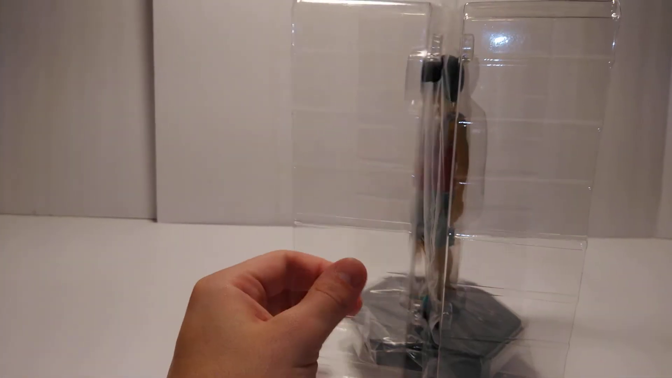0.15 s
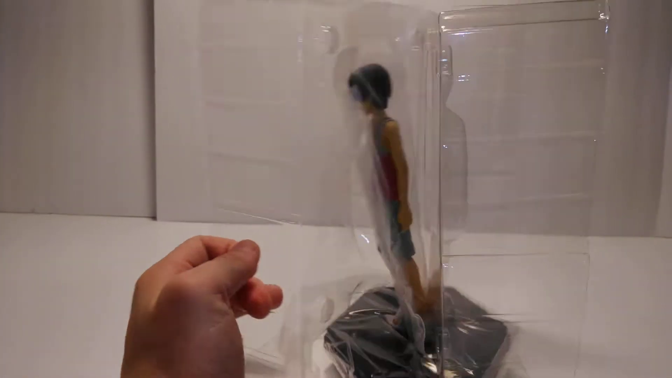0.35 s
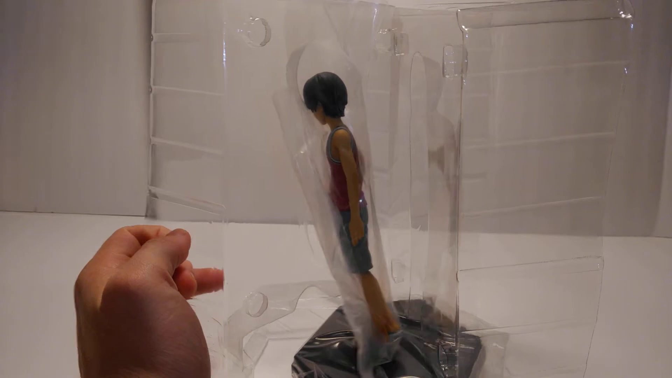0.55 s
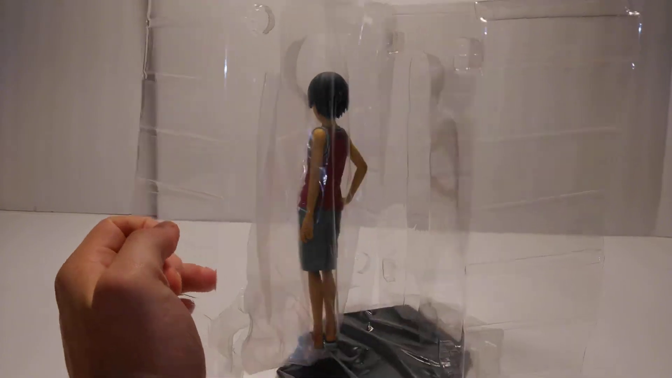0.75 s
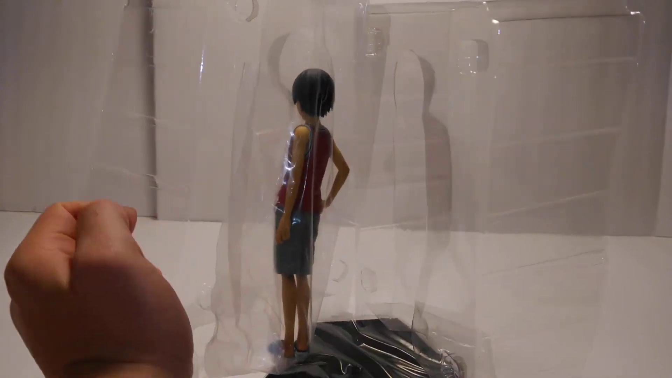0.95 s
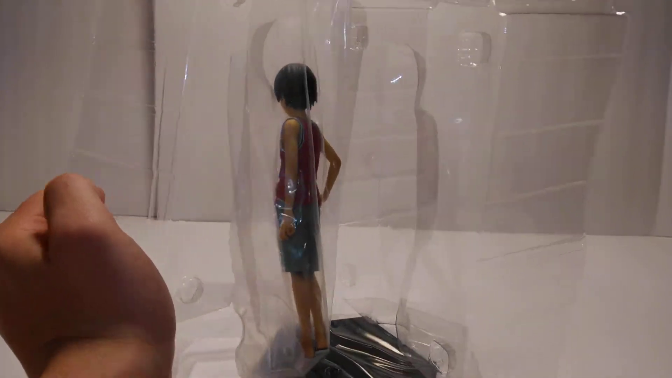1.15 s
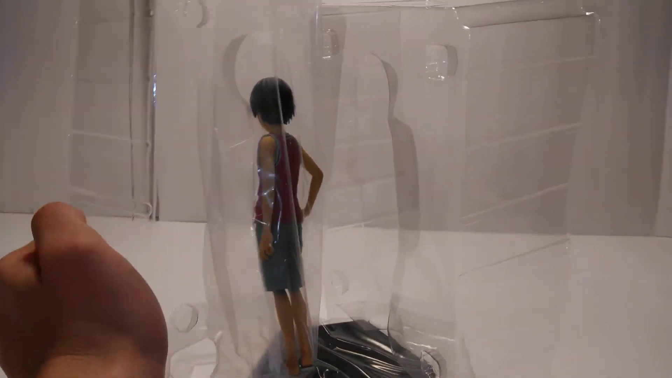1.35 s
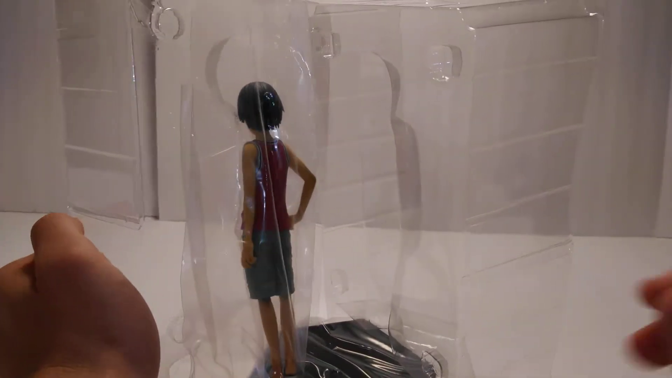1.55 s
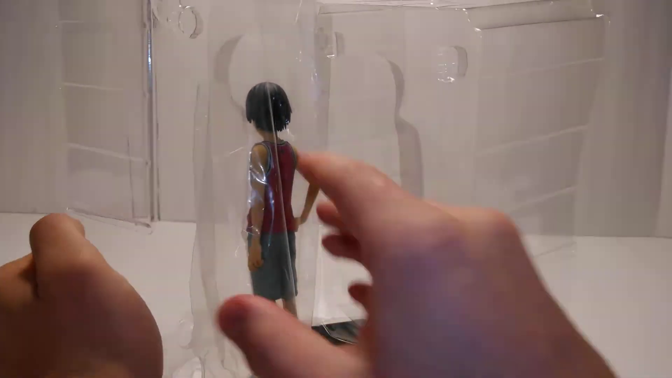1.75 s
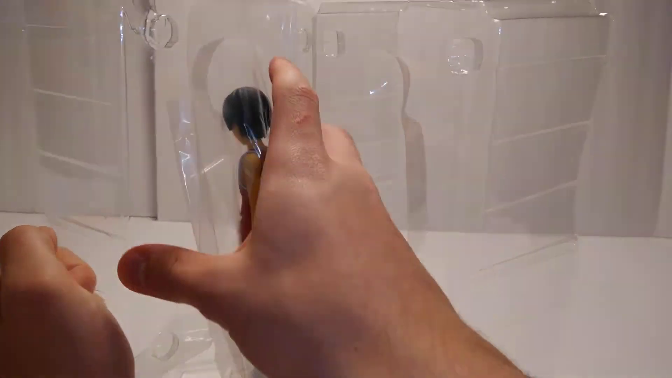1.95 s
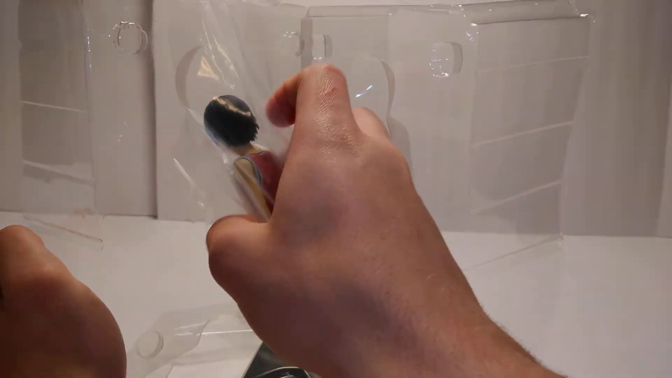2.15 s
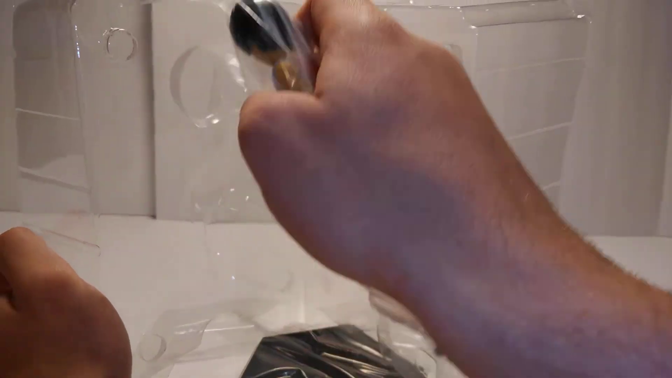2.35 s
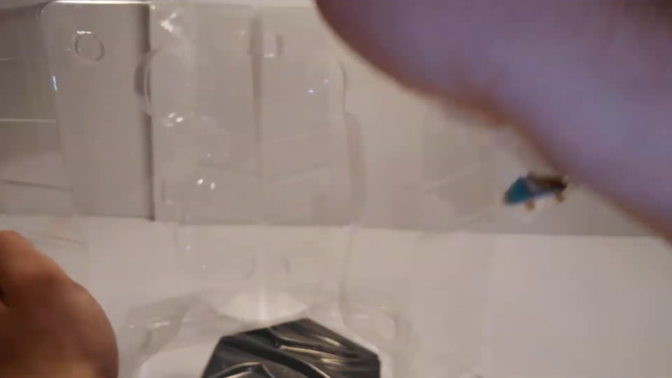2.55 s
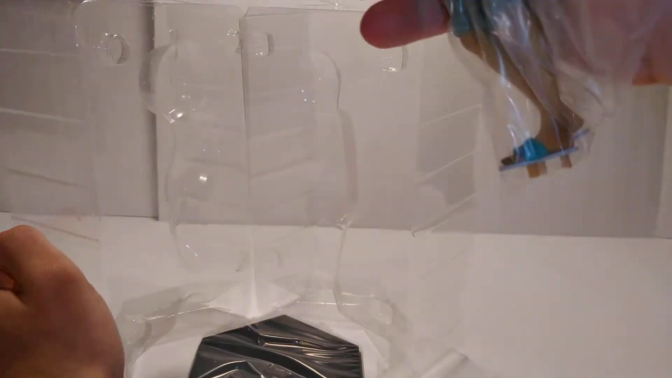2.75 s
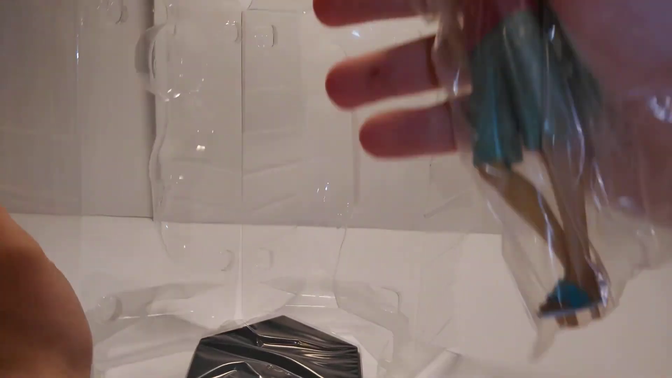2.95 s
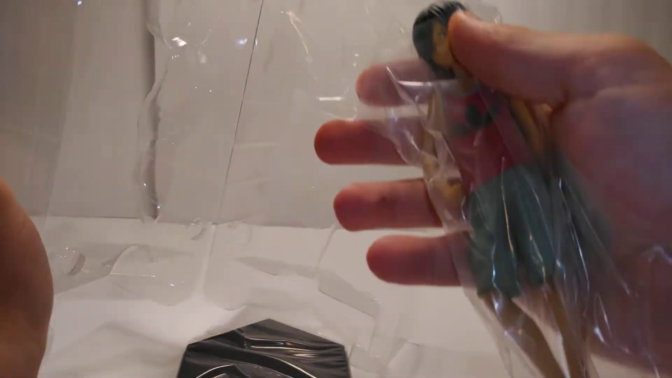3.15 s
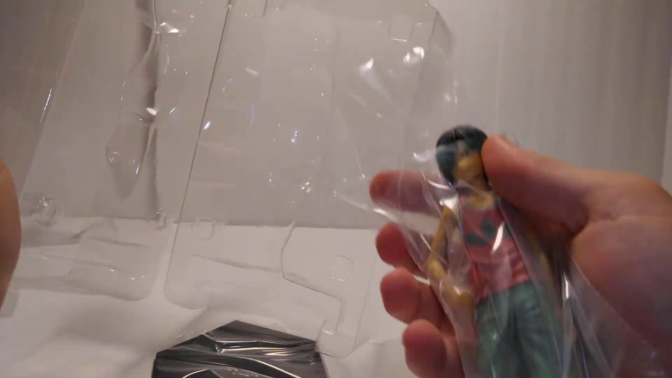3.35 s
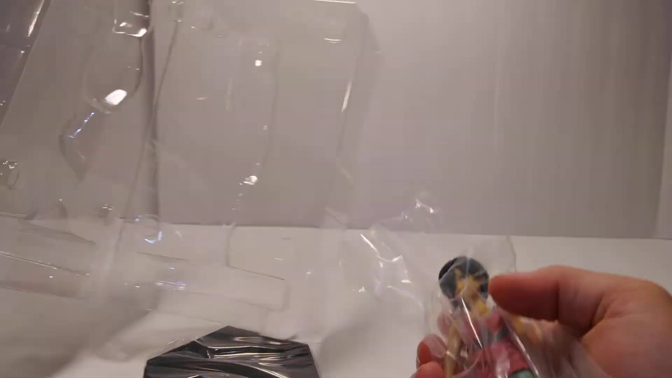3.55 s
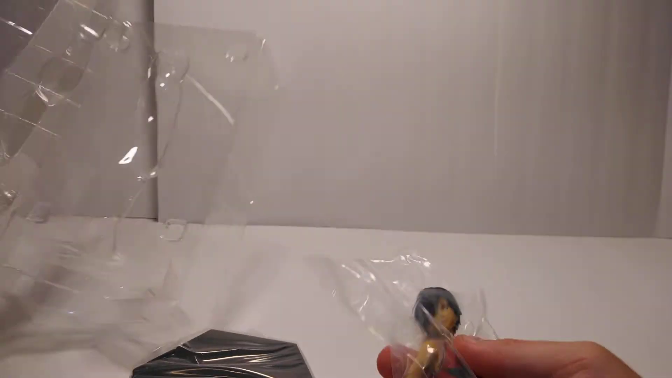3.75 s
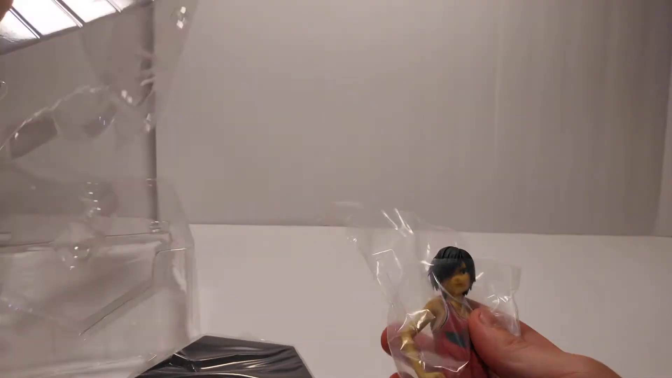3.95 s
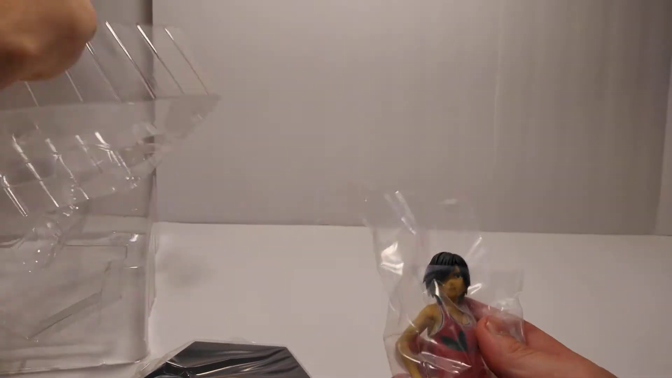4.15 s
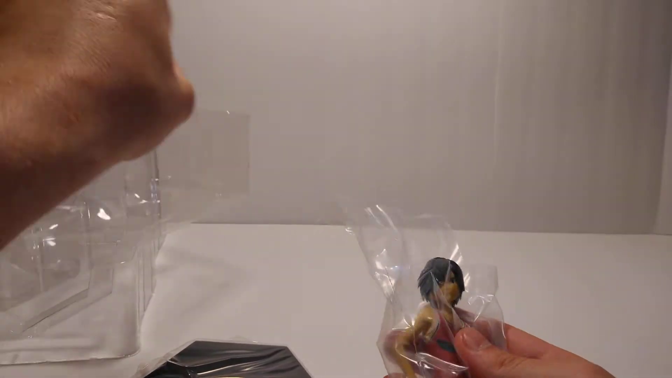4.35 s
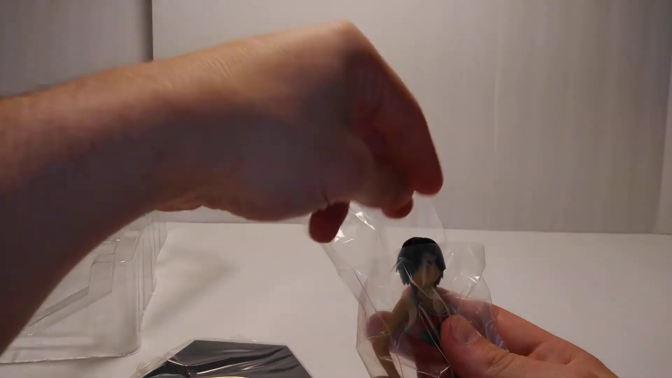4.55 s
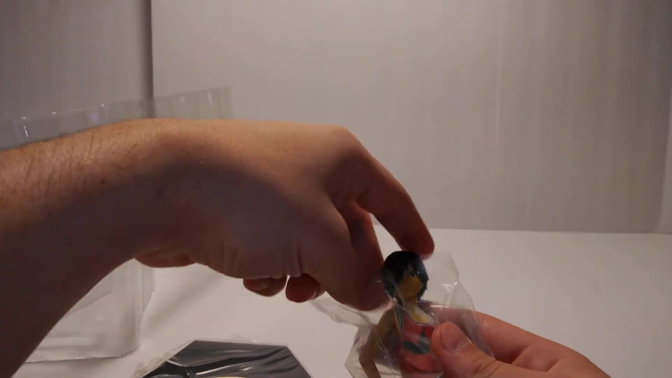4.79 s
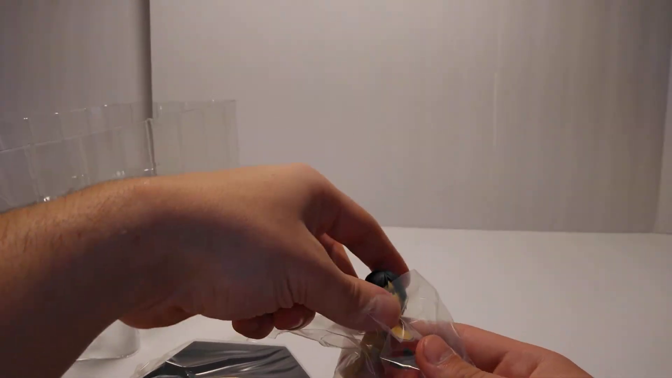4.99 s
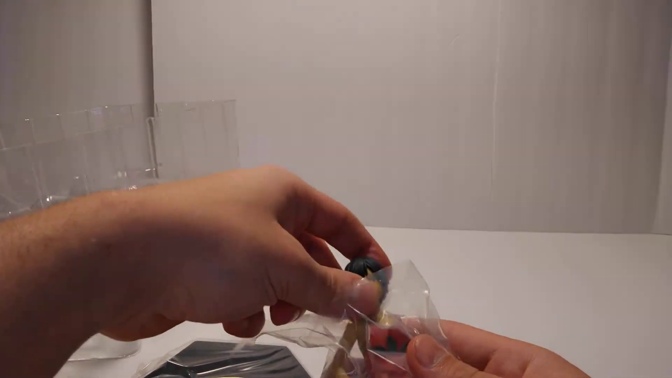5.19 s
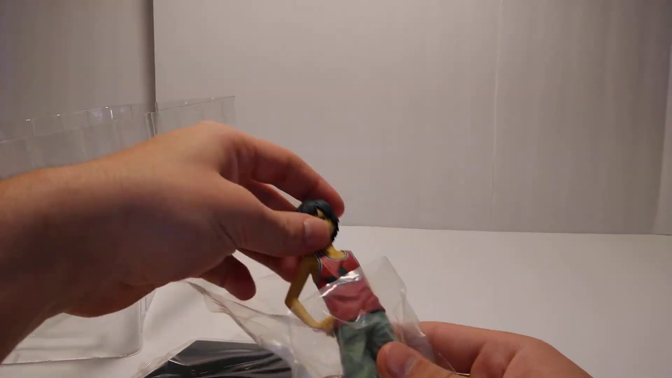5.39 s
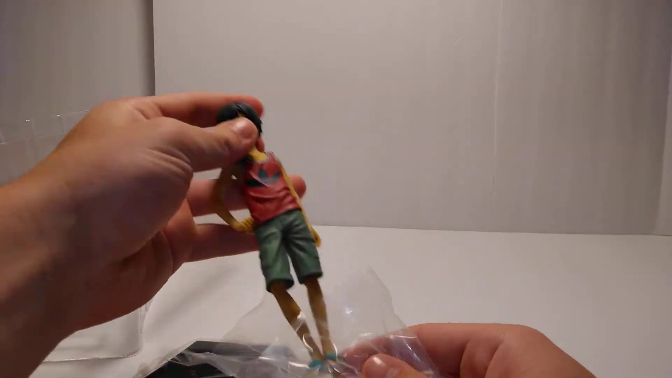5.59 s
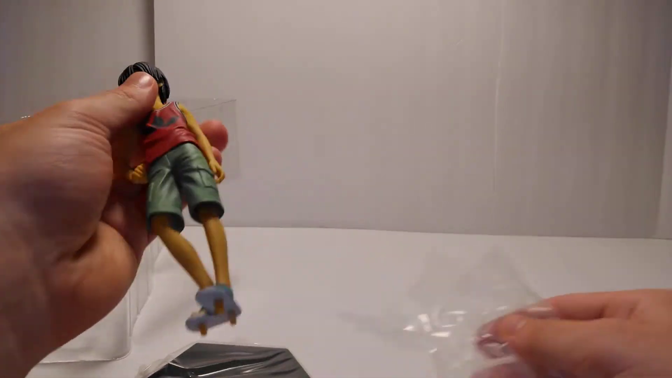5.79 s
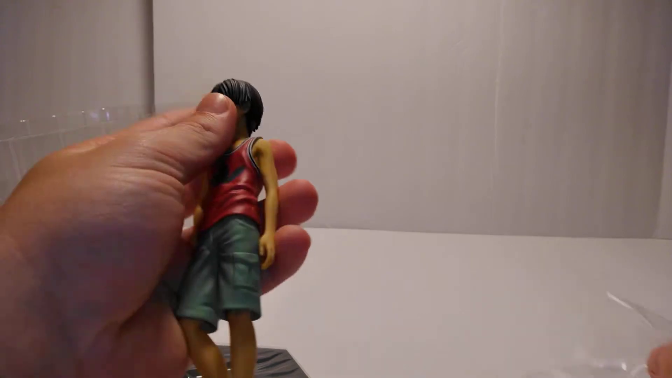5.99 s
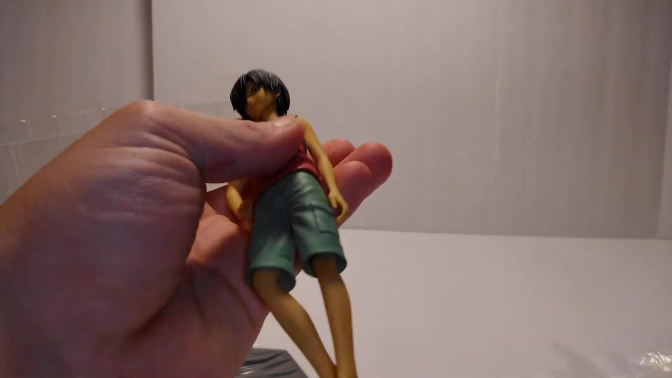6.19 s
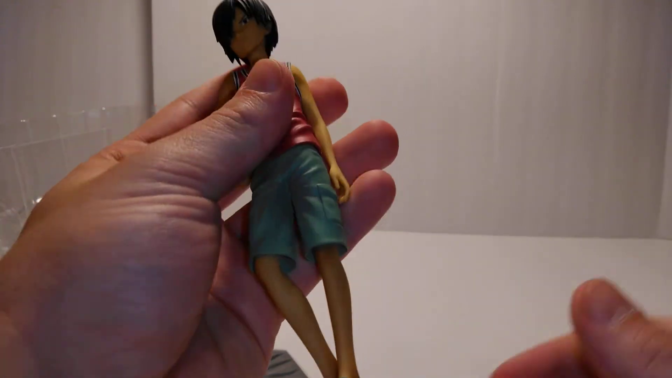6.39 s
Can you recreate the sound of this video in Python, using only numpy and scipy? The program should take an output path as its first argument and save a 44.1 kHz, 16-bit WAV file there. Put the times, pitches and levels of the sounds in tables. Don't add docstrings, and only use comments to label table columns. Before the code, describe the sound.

Close, bright crinkling of packaging: hollow tray knocks, a loud snap as it opens, then fine bag crackle fading to near quiet.

```python
import sys
import numpy as np
from scipy import signal
from scipy.fft import rfft, irfft, next_fast_len
from scipy.io import wavfile
from scipy.ndimage import uniform_filter1d

SR = 44100
rng = np.random.default_rng(int(sys.argv[2]) if len(sys.argv) > 2 else 0)


def master_out(mix):
    frames = np.transpose(np.atleast_2d(mix))
    ceiling = np.clip(frames, -1, 1)
    pcm = np.round(ceiling * 32767).astype(np.int16)
    wavfile.write(sys.argv[1], SR, pcm)


def rack_gain(trim_db):
    fader = np.asarray(trim_db, float)
    return 10 ** (fader / 20)


N = 283563

# pitch_hz, level_db
AIR_SPECTRUM = [(15, -40), (25, 29), (266, 14), (706, 7.5), (1220, -5), (2900, -14), (10700, -40),
                (16500, -46)]
# pitch_hz, t60_s
ROOM_DECAY = [(100, 0.7), (1500, 0.073), (16000, 0.097)]
# start_s, peak_db, pitch_hz
TABLE_BUMPS = [(0.015, -67, 85), (0.33, -49, 62), (0.55, -53, 88.4), (1.441, -60, 127), (1.56, -65, 101),
               (1.995, -51, 55), (2.03, -48, 76.5), (2.09, -57, 65), (2.131, -44, 60), (2.19, -60, 56),
               (2.27, -66, 50), (2.525, -44, 120), (2.557, -62, 136), (2.675, -53, 69), (3.196, -51, 85),
               (3.226, -46.5, 85.7), (3.28, -50.5, 80.5), (3.375, -45, 140), (3.476, -55.5, 81),
               (3.852, -58, 101), (3.991, -47.5, 90), (4.035, -54, 60), (4.12, -57, 75), (4.2, -56, 95),
               (4.26, -63, 70), (5.315, -64, 116), (5.42, -66, 100), (5.775, -64, 80), (6.375, -56, 119)]
# start_s, peak_db, boom_hz, walls_relative_db, t60_s
TRAY_KNOCKS = [(0.183, -52.5, 470, -5, 0.3), (0.304, -29.5, 473, -12, 0.13), (0.435, -35, 221, 3, 0.21),
               (0.789, -32.5, 275, -1.5, 0.18), (0.931, -38, 290, -5.5, 0.071),
               (1.054, -46.5, 190, 0, 0.53), (1.297, -35, 323, -8, 0.064), (1.45, -57, 163, -7, 0.084),
               (1.898, -40.5, 157, -3, 0.11), (2.093, -36, 233, -2, 0.24), (2.19, -40.5, 184, -5, 0.099),
               (2.349, -42.5, 315, -6, 0.18), (2.522, -33.5, 390, 7.5, 0.079), (2.56, -33, 153, -2, .25),
               (2.95, -41, 140, -22, 0.042), (3.193, -38.5, 366, 12.5, 0.21), (3.263, -31, 434, -6, 0.065),
               (3.329, -36, 490, -1.5, 0.043), (3.383, -34.5, 324, -2.5, 0.2),
               (3.994, -31.5, 283, -4.5, 0.32), (4.128, -37.5, 194, -23, 0.14), (5.5, -57, 340, 9, 0.19),
               (6.387, -49.5, 375, -67, 0.087)]
# pitch_hz, width_hz, level_db
HOLLOW_MODES = [(132, 94, -9.5), (212.2, 109, 0.5), (249.7, 77.5, 3), (346, 60, -1), (516, 29, -6)]
# pitch_hz, width_hz, level_db
WALL_MODES = [(607, 190, 3.5), (704, 93, 8.5), (851, 57, 10), (1012, 44, 6.5), (1264, 276, 3.5),
              (1920, 3200, -2.5)]
# start_s, peak_db, pitch_hz
WALL_DENTS = [
    (4.396, -35, 1070),
    (4.51, -51, 930),
    (4.562, -48, 920),
    (4.715, -37.5, 1046),
    (5.581, -46.5, 760),
    (5.853, -55, 940),
]
# peak_s, rise_s, fall_s, level_db, upper_walls_relative_db
TRAY_DRAGS = [(0.17, 0.35, 0.19, -68.5, -7), (0.32, 0.025, 0.17, -41.5, -4.5), (0.81, 0.9, 0.13, -55.5, 2),
              (1.32, 0.23, 0.12, -53, 1), (1.64, 0.57, 0.83, -70.5, 5), (1.95, 0.29, .1, -60, -7),
              (2.12, 0.2, 0.23, -44, 3), (2.55, 0.049, 0.24, -38.5, -2.5), (2.8, 0.19, 0.75, -57.5, 9.5),
              (3.22, 0.04, 0.19, -39.5, 0), (3.7, 0.46, 0.84, -63, 1.5), (4.01, 0.052, 0.15, -43, -2),
              (4.14, 0.072, 0.081, -41, -0.5), (4.3, 0.39, 1, -58, 2.5), (4.95, 1, 0.28, -61.5, 7),
              (5.6, 0.34, 0.8, -63.5, -1), (5.87, 0.075, 0.12, -56, 8), (5.96, 0.019, 0.42, -60, 2),
              (6.25, 0.12, 0.16, -63.5, -15), (6.43, 0.079, .1, -48.5, -42)]
# (pitch_hz, width_hz, level_db)
INNER_SLIDES = [
    (0.225, 1.152, -57.5, [(1370, 62, 0)]),
    (2.773, 2.92, -41, [(880, 70, -13), (1580, 72, -7), (2180, 71, -5)]),
]
# pitch_hz, level_db
FILM_SPECTRUM = [(1760, -26.5), (3000, -15.5), (4780, -11), (6280, -10.5), (8370, -4.5), (9940, -1.5),
                 (14400, -11.5), (15800, -37), (16300, -78)]
# pitch_hz, level_db
CREASE_SPECTRUM = [(110, -25), (250, -4), (900, 0), (1250, -1), (1500, 0), (2100, 4.5), (3000, -6),
                   (4500, -13.5)]
# start_s, peak_db, ring_hz, stiff_low_relative_db, left_right_db
LID_RIP = (2.5257, -8, 8700, -9, 0.5)
# start_s, peak_db, ring_hz
STIFF_CRACKS = [(0.3092, -24.5, 7600), (0.684, -32, 8150), (0.7101, -25.5, 2700), (0.7944, -35, 2920),
                (1.344, -30.5, 11500), (1.6375, -36, 9200), (1.9035, -40, 3180), (1.9404, -35.5, 8200),
                (2.3492, -21.5, 7900), (2.4501, -26, 8900), (3.2181, -26.5, 7100), (3.2657, -25, 7400),
                (3.384, -24.5, 11000), (3.5386, -24.5, 8400), (3.975, -37, 9500), (3.9973, -26, 9300),
                (4.1277, -19.5, 8060), (4.383, -25.5, 7700), (4.491, -36.5, 11200), (4.5585, -31.5, 6230),
                (4.8397, -26.5, 7400), (5.0363, -37, 5140), (5.0861, -38, 7800), (5.1474, -42, 11100),
                (5.9784, -38, 6250), (6.0535, -35, 4330), (6.218, -33.5, 4100), (6.2515, -42, 9400)]
# start_s, peak_db, ring_hz, left_right_db
LID_TICKS = [(0.5906, -22, 11500, 13.5), (0.6756, -29, 8200, -10), (0.734, -30, 7500, -9),
             (0.7405, -34, 7800, 0), (0.8332, -33, 12100, -12), (1.0721, -33.5, 12000, 26),
             (1.277, -33, 9000, -9), (1.6043, -44.5, 8900, -24), (1.7184, -56, 9140, -25),
             (2.0658, -21.5, 9600, -3), (2.078, -26.5, 8000, 13.5), (2.1015, -20, 8200, -4.5),
             (2.166, -25.5, 4200, -9.5), (2.1776, -29.5, 4530, 14.5), (2.195, -25.5, 11100, -5),
             (2.2148, -24.5, 7300, -11.5), (2.3103, -16, 8600, -1), (2.5084, -24.5, 10600, -5),
             (2.722, -24.5, 7200, -1), (2.934, -35, 7550, -8), (2.981, -24.5, 9100, 2),
             (3.1157, -25, 7700, -13), (3.1475, -32, 10400, 6), (3.24, -25, 7100, 0)]
# start_s, peak_db, ring_hz
THIN_BAG_TICKS = [(3.3561, -22.5, 10500), (3.438, -28, 7660), (3.6552, -23, 11700), (3.689, -22.5, 8240),
                  (3.7741, -23, 7840), (4.0707, -30, 4730), (4.4176, -29.5, 7500), (4.5204, -23, 12300),
                  (4.6885, -33.5, 11100), (4.805, -33, 7500), (4.9115, -28, 7050), (4.974, -24, 7850),
                  (5.1816, -22.5, 8700), (5.235, -32, 8000), (5.2513, -25.5, 9260), (5.3203, -24, 7900),
                  (5.4348, -25, 9900), (5.462, -24.5, 4500), (5.6038, -18, 7840), (5.6982, -21, 10200),
                  (5.8005, -28, 9600)]
# start_s, peak_db, ring_hz
LID_FLICKS = [(0.2951, -26, 6800), (0.3387, -26, 7900), (0.3836, -29, 10700), (0.443, -24, 3720),
              (0.5941, -30, 10200), (0.7797, -31, 8100), (0.8623, -33, 11300), (0.9219, -45, 6550),
              (1.1706, -35.5, 7260), (1.2369, -38, 9900), (1.2522, -37, 8300), (1.6325, -38, 8260),
              (1.9593, -45, 6700), (1.963, -30, 8200), (1.9668, -36, 8450), (1.9703, -33.5, 8070),
              (2.1224, -25, 6700), (2.1506, -20.5, 8400), (2.2264, -26, 6530), (2.2319, -24.5, 8700),
              (2.2549, -24.5, 8900), (2.2688, -18, 8350), (2.2823, -13.5, 10600), (2.2923, -17, 8800),
              (2.3165, -35.5, 8700), (2.321, -16, 8740), (2.329, -30, 12100), (2.3709, -28, 8300),
              (2.3783, -14, 7100), (2.3881, -25, 8320), (2.3998, -23, 8500), (2.4749, -39, 5400),
              (2.4831, -35, 8660), (2.4866, -35, 7800), (2.5026, -20, 7700), (2.5659, -21, 9300),
              (2.762, -43.5, 4700), (2.7667, -24, 6600), (2.7747, -27, 12900), (2.7812, -24, 13200),
              (2.7852, -18, 8200), (2.7927, -20.5, 13100), (2.838, -26, 11900), (2.87, -22.5, 11800),
              (2.9525, -28, 5900), (2.989, -26, 9050), (2.9977, -50, 2600), (3.1222, -30, 7100),
              (3.1281, -31, 8300), (3.1957, -32, 2580)]
# start_s, peak_db, ring_hz
THIN_BAG_FLICKS = [(3.5322, -22.5, 9700), (3.5492, -30, 9500), (3.6674, -25, 9600), (3.7096, -30, 6900),
                   (3.7278, -25, 8700), (3.7348, -26, 11000), (3.7425, -28.5, 7600), (3.746, -22, 9300),
                   (3.7797, -23, 9300), (3.846, -24.5, 8300), (3.9934, -25.5, 11000), (4.0191, -37, 7100),
                   (4.0288, -29, 11700), (4.0835, -33, 7100), (4.09, -24.5, 7040), (4.1336, -27, 3430),
                   (4.169, -30.5, 6500), (4.2321, -32, 3800), (4.2521, -34, 3800), (4.2718, -37, 8100),
                   (4.3489, -29, 8000), (4.3943, -32, 8600), (4.7018, -43, 10100), (4.7078, -41, 5300),
                   (4.7208, -22, 10700), (4.7325, -33, 8800), (4.7362, -32, 10000), (4.7674, -31, 8100),
                   (4.823, -29, 7750), (4.8522, -32, 7800), (5.1336, -39, 8000), (5.1915, -41, 10900),
                   (5.2561, -30, 9700), (5.2992, -44, 12300), (5.3366, -24, 7150), (5.3444, -27, 9000),
                   (5.3581, -24, 8400), (5.3758, -26, 7900), (5.3833, -29, 9900), (5.3878, -24.5, 7700),
                   (5.4282, -25.5, 6700), (5.4489, -43, 10100), (5.4776, -31, 6900), (5.4918, -28, 11400),
                   (5.5279, -27, 9100), (5.5314, -23, 7700), (5.5424, -29, 9400), (5.5496, -23, 8150),
                   (5.5561, -20, 7400), (5.5818, -24, 8300), (5.5856, -27, 10300), (5.6145, -34, 7200),
                   (5.6277, -19, 4050), (5.6477, -21, 8500), (5.6796, -28, 5140), (5.6878, -28, 7300),
                   (5.7163, -35, 4580), (5.7868, -26, 8000), (5.7946, -32, 6500), (5.8445, -32, 7400)]
# start_s, contact_db, creases_relative_db, crackle_relative_to_slide_db, thinness_db
HAND_CONTACT = [(0.0, -71, -25, -1, 0), (0.2, -82, -43, -15, -1), (0.3, -60.5, 17, -17.5, -23),
                (0.64, -61, 0, -17, 4), (0.85, -63, 6, -6, -18), (1.25, -68.5, 6, -9, -0.5),
                (1.46, -81, -15, -25, 4), (1.76, -90, 10, -10, -23), (2.1, -48, -6.5, -8.5, -10),
                (2.5, -48.5, -13.5, -18, -10), (2.9, -73.5, 5, -11.5, -12), (3.5, -57.5, -0.5, 3, -12),
                (3.94, -48, -9.5, -25.5, -12), (4.4, -62.5, 0.5, 7.5, -23), (4.67, -91.5, 17.5, 2, -21),
                (4.9, -51.5, -7.5, -3, -20), (5.17, -67, -5, 2, -5), (6.43, -70.5, -35, -7.5, -32)]
# peak_s, rise_s, fall_s, effort_db, creases_relative_db
OPENING_GRIPS = [(0.0, .05, 0.54, -52.5, -32), (0.228, .012, 0.088, -39.5, -4.5),
                 (0.415, 0.22, 0.14, -37, -5.5), (0.594, 0.013, 0.037, -51, -17),
                 (0.68, 0.021, 0.13, -71, 0), (1.066, 0.43, 0.2, -49, -15), (1.346, 0.15, 0.12, -59, -4),
                 (1.607, 0.4, 0.11, -62, -12), (1.965, 0.0078, 0.014, -43, -18),
                 (1.94, 0.066, 0.038, -61, 0), (2.108, 0.023, 0.071, -39.5, 1.5),
                 (2.254, 0.012, 0.036, -25.5, -34), (2.28, 0.04, 0.034, -35.5, -51),
                 (2.315, 0.017, 0.017, -35.5, -32), (2.383, 0.035, 0.021, -37, -11.5),
                 (2.531, 0.019, .26, -30, -9.5), (2.775, 0.041, 0.21, -36.5, -15.5),
                 (2.83, 0.041, 0.075, -37.5, -15), (2.868, 0.11, .025, -35.5, -16.5),
                 (2.953, 0.015, 0.036, -42, -6), (2.997, 0.0096, 0.0067, -34, 0),
                 (3.055, 0.25, 0.077, -40.5, -9.5), (3.122, 0.013, 0.13, -48.5, -7),
                 (3.232, 0.1, 0.17, -45, -32)]
# peak_s, rise_s, fall_s, effort_db, creases_relative_db
THIN_BAG_PULLS = [(3.545, 0.04, 0.064, -42, -8.5), (3.749, 0.14, 0.11, -42.5, -4),
                  (3.86, 0.19, 0.11, -29.5, -47.5), (3.9, 0.072, 0.06, -36.5, -37),
                  (3.998, 0.0058, 0.072, -37.5, -8), (4.09, 0.012, 0.21, -38.5, -17),
                  (4.273, 0.079, 0.073, -43, -14), (4.352, 0.0089, 0.033, -53, 3.5),
                  (4.564, 0.016, 0.099, -53, -2), (4.716, 0.041, 0.13, -48.5, -1),
                  (4.847, 0.03, 0.1, -45.5, -7), (5.188, 0.011, 0.075, -55.5, -8.5),
                  (5.346, 0.14, 0.17, -40.5, -13), (5.477, 0.091, 0.088, -63, -31),
                  (5.635, 0.34, 0.17, -38.5, -13), (5.794, 0.052, 0.24, -46.5, -7),
                  (6.112, 0.28, 0.14, -56.5, -9.5), (6.25, 0.17, 0.2, -60, -13)]


def evened(x):
    return x / np.sqrt(np.mean(x ** 2) + 1e-20)


def read(points, hz):
    f, value = np.transpose(points)
    return np.interp(np.log(hz + 1), np.log(f + 1), value)


def curves(rows):
    s, *columns = np.transpose(rows)
    return [np.interp(np.arange(N) / SR, s, column) for column in columns]


def colour(x, points):
    length = x.shape[-1]
    size = next_fast_len(length, True)
    gain = rack_gain(read(points, np.fft.rfftfreq(size, 1 / SR)))
    return irfft(rfft(x, size) * gain, size)[..., :length]


def ring(x, modes):
    out = 0
    for k, (hz, width_hz, db) in enumerate(modes):
        pole = np.exp((-np.pi * width_hz + 2j * np.pi * hz) / SR)
        mode = signal.lfilter([1 - abs(pole)], [1, -pole], x).imag * 2
        out = out + (-1) ** k * rack_gain(db) * mode
    return out


def add(mix, s, sound):
    part = mix[:, round(s * SR):][:, :sound.shape[1]]
    part += sound[:, :part.shape[1]]


def pair(shared, own, lag, same):
    same = np.clip(same, 0, 1)
    direct = np.array([np.roll(shared, int(lag)), shared])
    return same * direct + np.sqrt(1 - same ** 2) * own


def strokes(rows, rest_db, rest_part_db):
    t = np.arange(N) / SR
    main = rack_gain(2 * rest_db) + 0 * t
    part = rack_gain(2 * (rest_db + rest_part_db)) + 0 * t
    swell_power = 1.623
    for s, rise, fall, db, part_db in rows:
        start, end = s - abs(rise), s + abs(fall)
        span = slice(max(round(start * SR), 0), round(end * SR))
        swell = np.interp(t[span], [start, s, end], [0, 1, 0]) ** (2 * swell_power)
        main[span] += rack_gain(2 * db) * swell
        part[span] += rack_gain(2 * (db + part_db)) * swell
    return np.sqrt(main), np.sqrt(part)


def swarm(per_s, spread_db, clump_db, tail_ms, same, facet_db, count=10):
    strength = rack_gain(spread_db * np.minimum(rng.exponential(1, N), 3.5))
    strength = strength * (rng.random(N) < per_s / SR)
    place = rng.integers(0, count, N)
    t = np.arange(600) / SR
    shape = np.exp(-t * 1000 / tail_ms) * (1 - np.exp(-t / 0.0004))
    out = np.zeros((2, N))
    for k, hz in enumerate(np.geomspace(1500, 13000, count)):
        busy = evened(uniform_filter1d(rng.standard_normal(N // 128 + 1), size=8))
        busy = np.repeat(busy, 128)[:N]
        shared, *own = rng.standard_normal((3, len(t))) * shape
        flutter = pair(np.roll(shared, 8), np.array(own), rng.integers(-4, 14), same)
        flutter = colour(flutter, [(hz / 1.71, -facet_db), (hz, 0), (hz * 2.8, -facet_db)])
        strikes = strength * (place == k) * rack_gain(clump_db * busy)
        out += signal.oaconvolve(strikes[None], evened(flutter), axes=1)[:, :N]
    return evened(out)


def air():
    shared, *own = rng.standard_normal((3, N))
    own = colour(np.array(own), [(200, 1.0), (900, 14.5)])
    return rack_gain(-84) * evened(colour(pair(shared, own, 0, same=0.7), AIR_SPECTRUM))


def room(x):
    taps = np.zeros((2, SR // 2))
    at = np.arange(300, SR // 2 - 20, 20)
    at = at + rng.integers(0, 20, (2, len(at)))
    np.put_along_axis(taps, at, rng.choice([-1., 1.], at.shape), 1)
    taps[1] = taps[1] + colour(taps[0] - taps[1], [(250, 2.5), (900, -26)])
    hz, t, z = signal.stft(taps, SR, nperseg=256)
    decay = rack_gain(-60 * t / read(ROOM_DECAY, hz)[:, None])
    tail = signal.istft(z * decay, SR, nperseg=256)[1]
    return signal.fftconvolve(x, tail / np.linalg.norm(tail[0]), axes=1)[:, :N]


def bumps():
    out, t = np.zeros((2, N)), np.arange(12000) / SR
    rise_s, t60_s = 0.006, 0.1
    shape = (1 - np.exp(-t / rise_s)) * rack_gain(-60 * t / t60_s)
    for s, peak_db, hz in TABLE_BUMPS:
        push = np.sin(2 * np.pi * hz * t) * shape
        add(out, s, rack_gain(peak_db + 5.0) * pair(push, 0, 6.6, same=1))
    return out


def scrape():
    level, walls = strokes(TRAY_DRAGS, -101.5, 4.0)
    taps = swarm(per_s=500, spread_db=0.5, clump_db=3.0, tail_ms=0.18, same=0.91, facet_db=-8.0, count=4)
    blended = taps + 0.33 * taps[::-1]
    boom = evened(ring(colour(blended, [(60, -16.5), (140, -1)]), HOLLOW_MODES))
    out = rack_gain(0.5) * (level * boom + walls * evened(ring(taps, WALL_MODES)))
    for start, end, slide_db, hollow in INNER_SLIDES:
        stroke = np.interp(np.arange(N) / SR, [start - 0.02, start, end - 0.03, end], [0, 1, 1, 0])
        out = out + rack_gain(slide_db) * stroke * evened(ring(taps, hollow))
    return out


def dents():
    out, t = np.zeros((2, N)), np.arange(1500) / SR
    shape = (1 - np.exp(-t / 0.00035)) * rack_gain(-60 * t / 0.031)
    for s, peak_db, hz in WALL_DENTS:
        pip = np.sin(2 * np.pi * hz * t) * shape
        add(out, s, rack_gain(peak_db + 12.0) * pair(pip, 0, 15.2, same=0.77))
    return out


def knocks():
    out, t = np.zeros((2, N)), np.arange(8000) / SR
    blow = 30 * np.exp(-t / 0.0003)
    draws = rng.standard_normal((len(TRAY_KNOCKS), 3, len(t)))
    for (s, peak_db, hz, walls_db, t60), (shared, *own) in zip(TRAY_KNOCKS, draws):
        shape = rack_gain(-60 * t / max(t60, 0.01)) * (1 + 1.5 * np.exp(-t / 0.00033))
        drive = pair(shared * shape + blow, own * shape, 6.3, same=0.75)
        drive = colour(drive, [(50, -13), (130, -3)])
        boom = ring(drive, HOLLOW_MODES + [(hz, 45, 3.0)])
        walls = ring(drive, WALL_MODES)
        knock = boom / abs(boom).max() + rack_gain(walls_db) * walls / abs(walls).max()
        add(out, s + 0.003114, rack_gain(peak_db + 2.0) * knock)
    return out


def snap(row, draw, hold_ms):
    s, peak_db, hz, low_db, pan_db = row
    shared, *own, jag = draw
    lead_s = 0.003
    t = np.arange(len(jag)) / SR - lead_s
    after_ms = np.maximum(t * 1000 - hold_ms, 0)
    onset = np.exp(np.minimum(t, 0) / 0.00015)
    flutter = np.exp(-after_ms / 0.8) + 0.3 * np.exp(-after_ms / 4.0)
    shape = onset * flutter * rack_gain(2.5 * jag)
    tick = 12 * (np.arange(len(jag)) == round(lead_s * SR))
    burst = pair(shared * shape + tick, own * shape, 5 + 5 * jag[0], same=0.7)
    high = colour(burst, FILM_SPECTRUM)
    high = evened(high) + 0.72 * evened(ring(high, [(hz, 1100, 0)]))
    low = colour(burst, CREASE_SPECTRUM)
    pan = rack_gain([[pan_db / 2], [-pan_db / 2]])
    sound = high / abs(high).max() * pan + rack_gain(low_db) * low / abs(low).max()
    return s - lead_s, rack_gain(peak_db + 3.0) * sound


def snaps():
    out = np.zeros((2, N))
    crack_body_db, tick_body_db, flick_body_db = -8, -20.5, -17.5
    rows = [(s, db, hz, tick_body_db, pan_db) for s, db, hz, pan_db in LID_TICKS]
    for table, body_db in ((STIFF_CRACKS, crack_body_db), (THIN_BAG_TICKS, tick_body_db),
                           (LID_FLICKS + THIN_BAG_FLICKS, flick_body_db)):
        for s, db, hz in table:
            pan_db = 1.5 * np.log2(hz / 9000)
            rows.append((s, db, hz, body_db, pan_db))
    rip, *draws = rng.standard_normal((len(rows) + 1, 4, 2048))
    add(out, *snap(LID_RIP, rip, hold_ms=8.0))
    for row, draw in zip(rows, draws):
        add(out, *snap(row, draw, hold_ms=0.45))
    return out


def rustle():
    rest_db, crease_db, crumple_db, thin_db = curves(HAND_CONTACT)
    effort, creases = strokes(OPENING_GRIPS + THIN_BAG_PULLS, rest_db, crease_db)
    slide = swarm(per_s=7000, spread_db=3.0, clump_db=3.5, tail_ms=2.53, same=0.89, facet_db=7.0)
    ticks = swarm(per_s=260, spread_db=3.2, clump_db=3.5, tail_ms=1.1, same=0.8, facet_db=13)
    buckles = slide + rack_gain(crumple_db - 2.0) * ticks
    film = evened(colour(buckles, FILM_SPECTRUM))
    top = colour(film, [(6500, -4.0), (10000, -0.5)])
    fizz = (film - top) * rack_gain(-0.45 * thin_db) + top * rack_gain(0.73 * thin_db)
    crackle = evened(colour(buckles, CREASE_SPECTRUM))
    return rack_gain(1.5) * (effort * fizz + creases * crackle)


def scene():
    hits = snaps() + knocks() + dents() + bumps()
    return hits + rack_gain(-14.5) * room(hits) + rustle() + scrape() + air()


def band_limit(x):
    return signal.sosfilt(signal.butter(12, 16400, fs=SR, output="sos"), x)


def record(dry):
    tilt = [(1000, 0.58), (2400, 0.1), (5000, -3.0), (8500, -2.0), (15000, 7.5)]  # pitch_hz, half_left_right_db
    left = colour(dry[0], tilt)
    right = colour(dry[1], [(hz, -db) for hz, db in tilt])
    ports = colour(np.array([left, right]), [(25, -8.0), (45, -15.0), (65, 0.5), (15300, 0.0), (16200, -19)])
    return band_limit(ports)


dry = scene()
out = record(dry)
master_out(out)
```